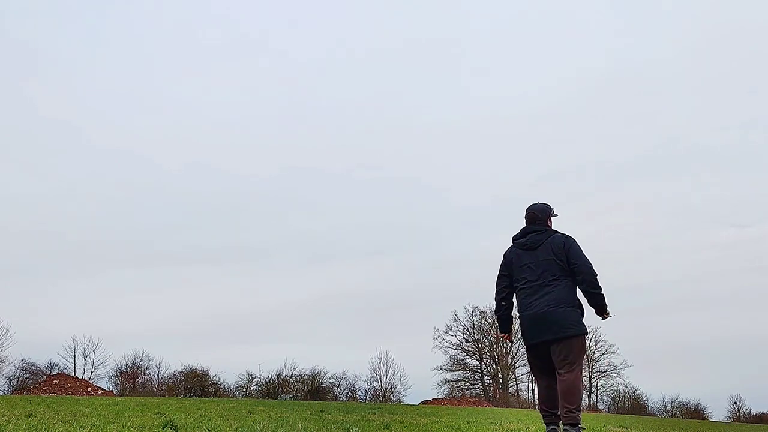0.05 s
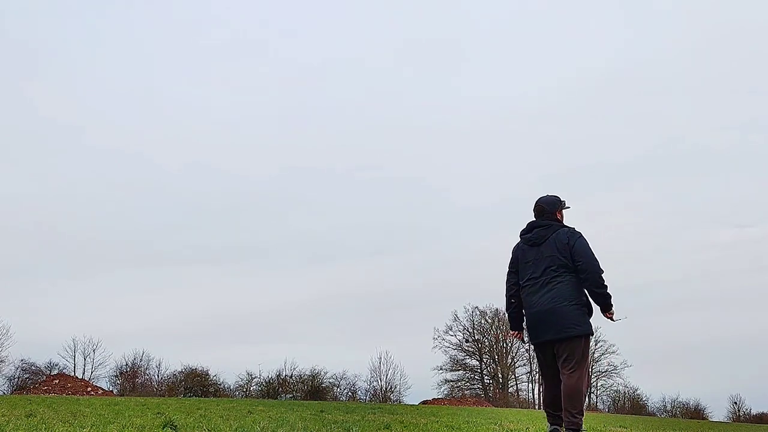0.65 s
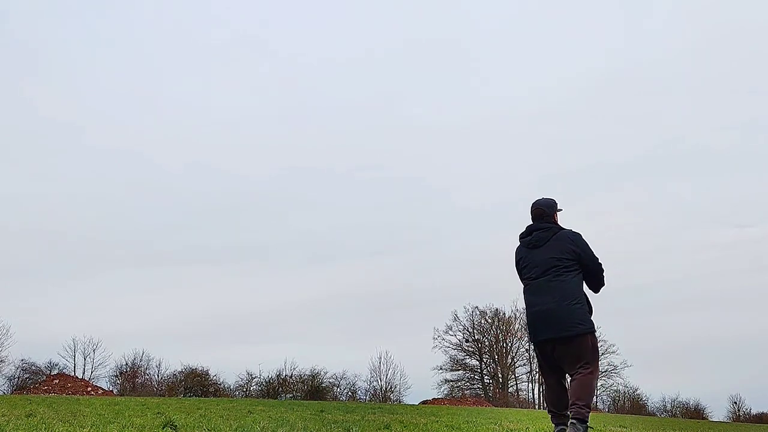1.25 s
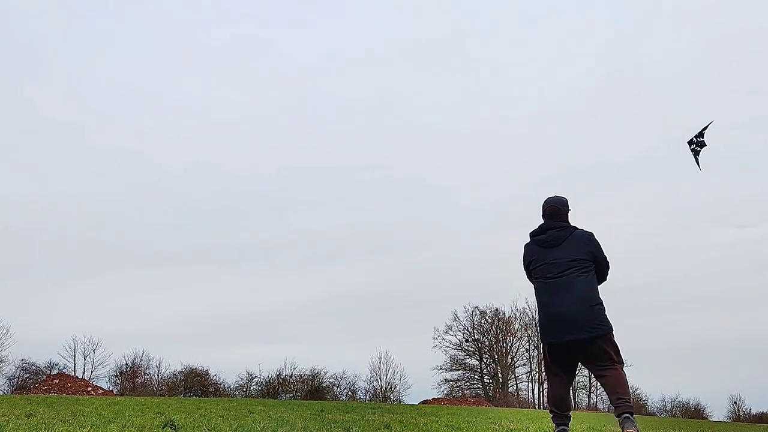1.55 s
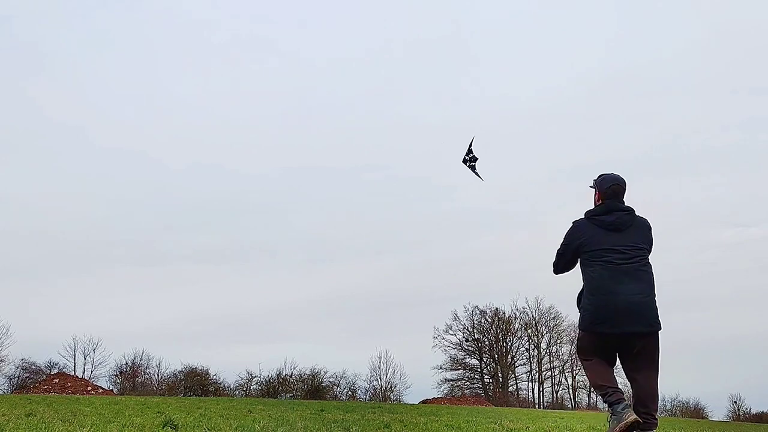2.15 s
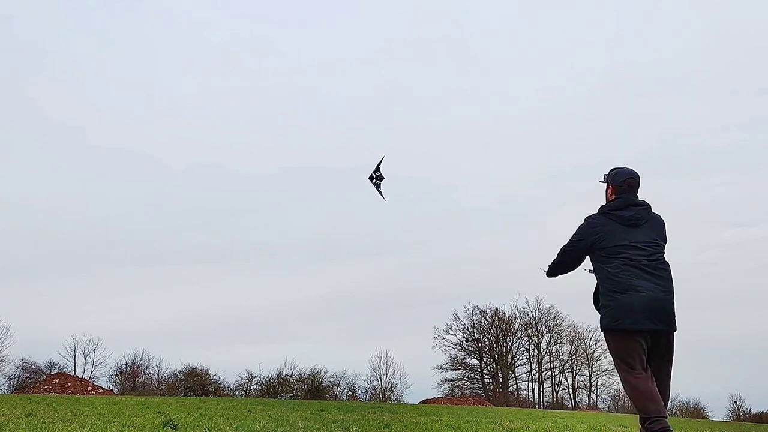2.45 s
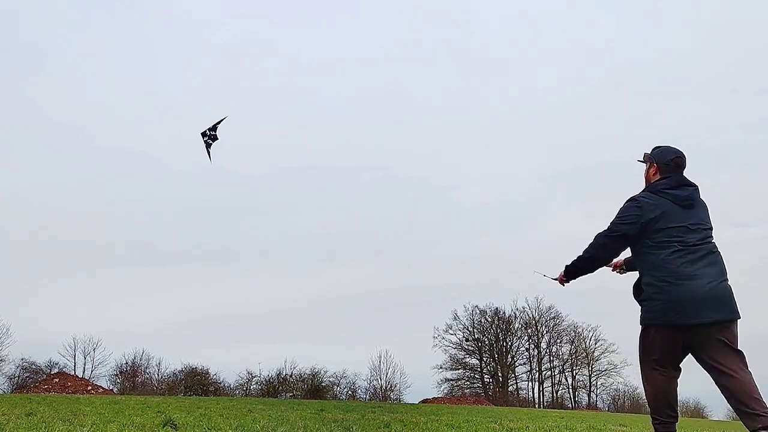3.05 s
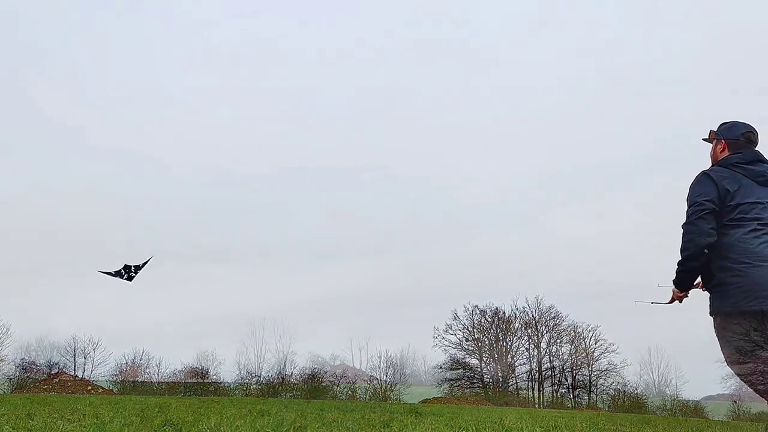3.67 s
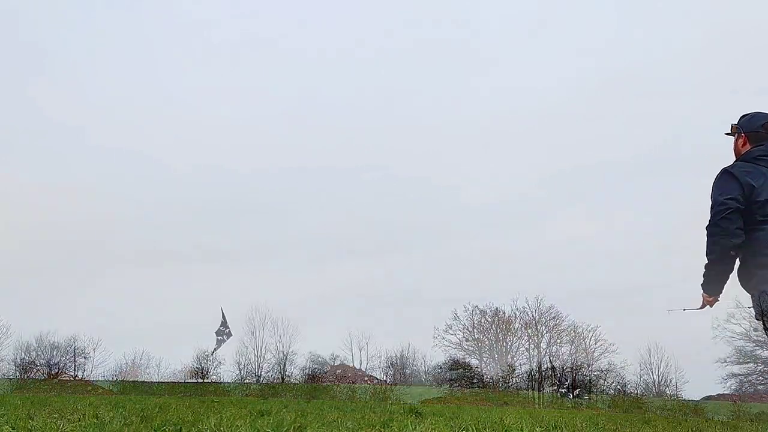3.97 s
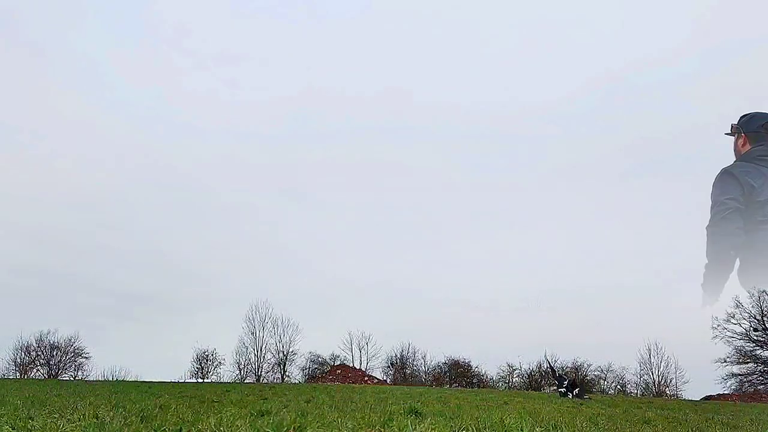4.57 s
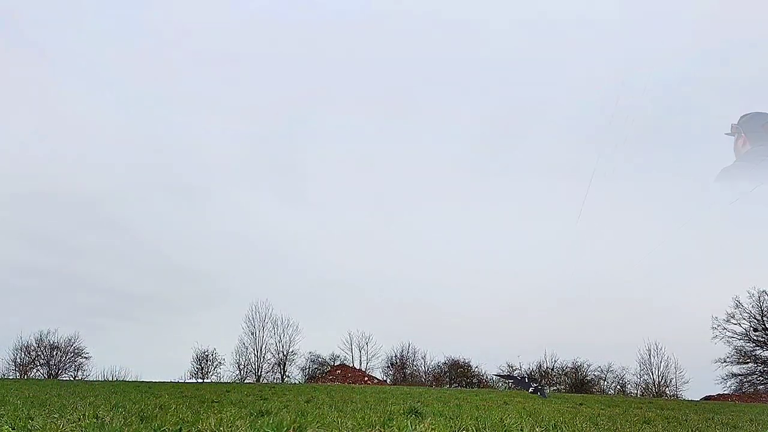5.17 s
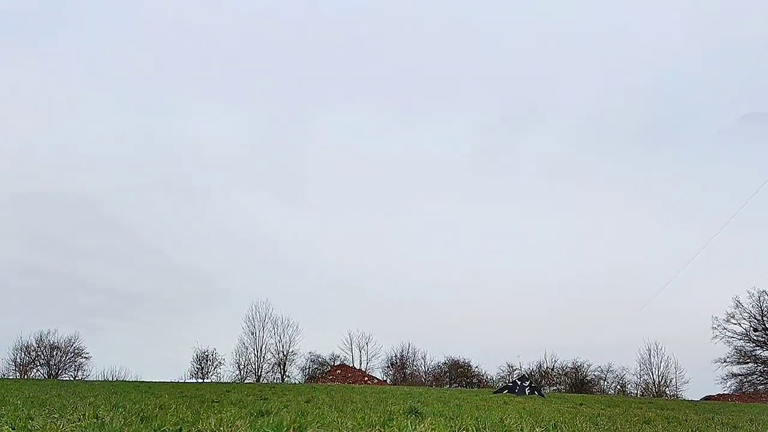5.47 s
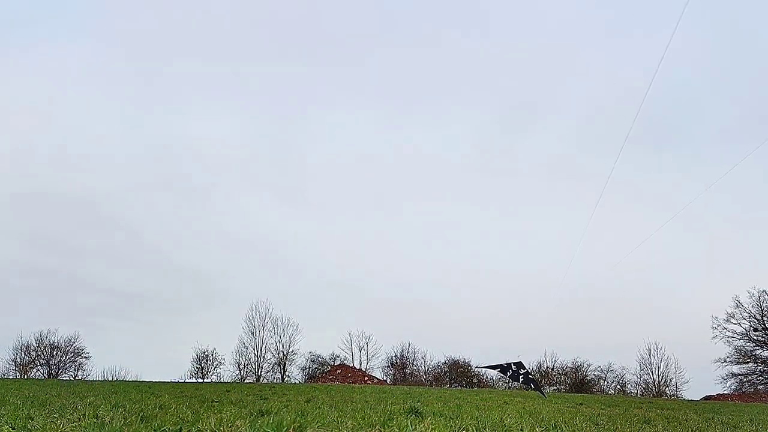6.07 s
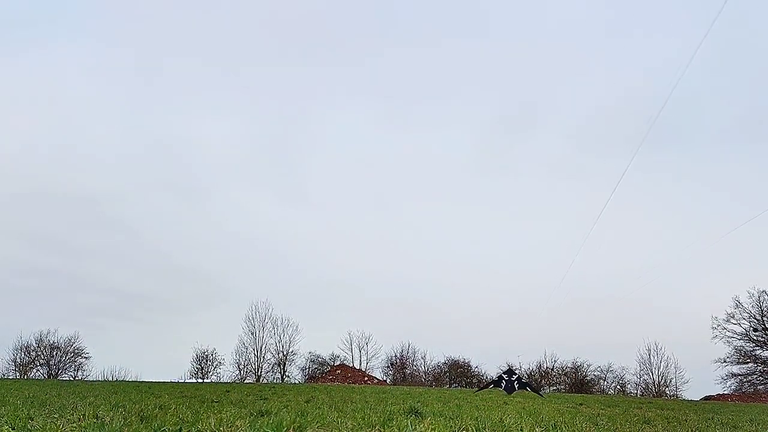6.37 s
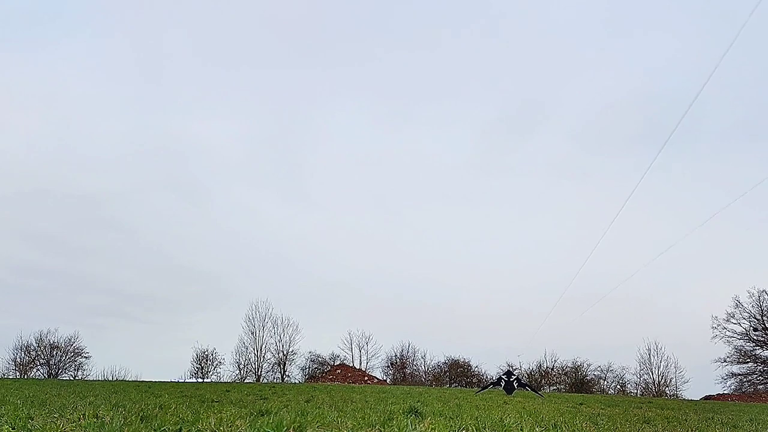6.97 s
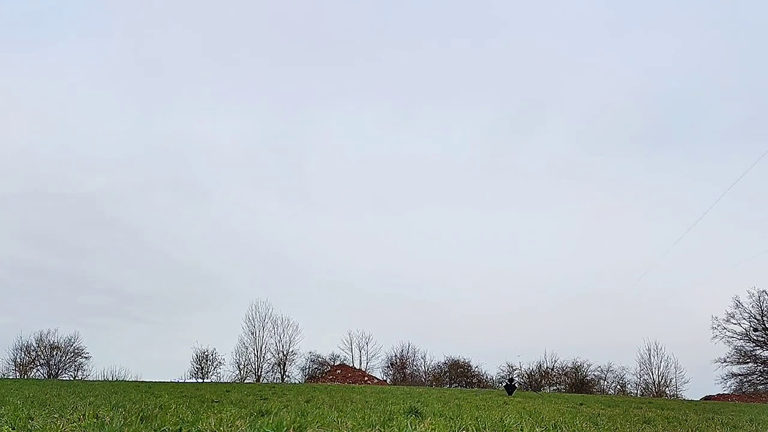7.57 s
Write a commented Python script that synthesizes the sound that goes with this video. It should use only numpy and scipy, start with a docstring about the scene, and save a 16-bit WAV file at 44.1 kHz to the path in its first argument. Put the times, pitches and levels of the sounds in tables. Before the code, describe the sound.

Low wind rumbles on a microphone near the ground in an open field, with uneven thumps, mostly on the left. At about 0.8 seconds a stunt kite catches the air on the right, its sail buzzing and its lines hissing beneath the wind. From 2 seconds the gusts hit hardest, slapping both sides, while the flutter turns ragged and the kite sweeps leftward with a hollow, shifting rush. It surges with each pull, most strongly near 2.8 seconds, buzzes again around 4, then fades as it comes down. The sound drops out briefly at about 4.6 seconds. Softer wind returns, with faint line swishes near 5 seconds and slack cloth twitching on the grass, including a dull thud at around 5.5. Another gust buffets the microphone near 6.8 seconds, and faint swishes of the lines follow in lighter wind until about 8.

```python
"""A stunt kite in the wind

A kite sweeps from right to left over a field, its sail fluttering and its lines hissing, while an
echo off the ground colours its rush. Wind buffets each port (opening) of a low microphone on its own.
The sound drops out briefly as the kite comes down, and then the kite twitches on the grass."""
import sys
import numpy as np
from scipy import signal
from scipy.fft import rfft, irfft, next_fast_len
from scipy.io import wavfile
from scipy.ndimage import uniform_filter1d, map_coordinates

SR = 44100
rng = np.random.default_rng(int(sys.argv[2]) if len(sys.argv) > 2 else 0)


def to_wav(s):
    """Save 16-bit WAV."""
    ch = np.atleast_2d(s).T  # columns
    pcm = np.round(np.clip(ch, -1, 1) * 32767)  # PCM
    wavfile.write(sys.argv[1], SR, pcm.astype(np.int16))


N = 344862
T = np.arange(N) / SR
DROPOUT_START_S, DROPOUT_END_S = 4.592, 4.783


def gain_of(db):
    """Turns decibels into a gain."""
    return np.exp(np.asarray(db) * (np.log(10) / 20))


def unit_rms(x):
    """Scales a signal to an average power of 1."""
    return x / np.sqrt(np.mean(x ** 2) + 1e-20)


def curves(rows):
    """Turns each column after the first into a curve over time."""
    times, *columns = np.transpose(rows)
    return [np.interp(T, times, column) for column in columns]


def value_at(points, f):
    """Looks up frequency f in a table, gliding between its rows."""
    hz, value = np.transpose(points)
    return np.interp(np.log(f), np.log(hz), value)


def filtered(x, response):
    """Gives each frequency its own gain."""
    size = next_fast_len(N + 4096, True)
    gain = response(np.fft.rfftfreq(size, 1 / SR) + 1)
    return irfft(rfft(np.float32(x), size) * np.complex64(gain), size)[..., :N]


def coloured(x, spectrum):
    """Shapes the tone of x, at a power of 1."""
    return unit_rms(filtered(x, lambda f: gain_of(value_at(spectrum, f))))


def noise(channels=1):
    """White noise, different in each channel."""
    return rng.standard_normal((channels, N))


def wander(rate_hz, channels=1):
    """A random drift with no wild extremes, at a power of 1."""
    times = np.arange(0, T[-1] + 1, 1 / (2 * rate_hz))
    values = np.tanh(rng.standard_normal((len(times), channels)).T / 2)
    return unit_rms(np.array([np.interp(T, times, row) for row in values]))


def delayed(x, ms):
    """A delay that may change with time."""
    return map_coordinates(x, [np.arange(len(x)) - ms * SR / 1000], order=3)


def at_ports(x, lead_ms):
    """Makes stereo: the sound reaches the left port lead_ms before the right."""
    return np.array([delayed(x, -lead_ms / 2), delayed(x, lead_ms / 2)])


def panned(pan_db):
    """Left and right gains of constant power; pan is left minus right."""
    gains = np.array([gain_of(pan_db / 2), gain_of(-pan_db / 2)])
    return gains / np.sqrt(np.mean(gains ** 2, 0))


def add(mix, start_s, sound):
    """Mixes in a stereo sound."""
    part = mix[:, max(round(start_s * SR), 0):][:, :sound.shape[1]]
    part += sound[:, :part.shape[1]]


# The tone of the background noise. Each row: frequency in Hz, relative level in dB.
BACKGROUND_SPECTRUM = [(100, -80.5), (330, -89), (500, -94.5), (700, -99), (1200, -101), (2500, -103),
                       (5000, -106), (7500, -107), (9500, -109), (14500, -107)]


def background(noise_db=-61.5, drone_db=-76.5, drone_hz=442.4, width_octaves=0.037):
    """Faint background noise: low outdoor rumble, the microphone's own hiss and a far-off drone."""
    drone = filtered(noise(), lambda f: 1 / (1 + (np.log2(f / drone_hz) / width_octaves) ** 2))
    rumble_and_hiss = coloured(noise(2), BACKGROUND_SPECTRUM)
    return gain_of(noise_db) * rumble_and_hiss + gain_of(drone_db) * unit_rms(drone)


# The wind, with one long gust midway. Each row: time in seconds, relative level in dB, pan in dB.
WIND_STRENGTH = [(0, -44.5, -0.5), (.55, -34, 2), (.98, -40, 3.5), (1.38, -28.5, 3), (1.68, -38, 6),
                 (1.92, -20.5, 3), (2.2, -23.5, -1.5), (2.48, -29.5, 7.5), (2.78, -23, 9.5),
                 (2.95, -30.5, -1), (3.35, -25, 3.5), (4.5, -30.5, 2), (4.8, -42.5, 3), (5.7, -43, 4),
                 (6.15, -40, 4.5), (6.75, -31.5, 0.5), (7.2, -44, 6.5), (7.82, -38.5, 7)]


def gusts(swirl_db=1, swell_db=4.5, swell_s=0.032):
    """Wind strength in dB at each port: the shared gust, local swirls and a swell at each buffet."""
    level_db, side_db = curves(WIND_STRENGTH)
    swells = np.zeros((2, N))
    for time_s, _, pan_db, _ in PORT_SLAPS:
        share = panned(pan_db)[:, None] ** 2 / 2
        swells = np.maximum(swells, share / (1 + ((T - time_s) / swell_s) ** 2))
    swirls = swirl_db * wander(5, channels=2)
    return level_db + np.array([side_db, -side_db]) / 2 + swirls + swell_db * swells


def eddy(t, width_s):
    """A small whirl of air crosses a port: suction, a slap, weaker suction."""
    u = t / width_s
    return (1 + u - .9 * u ** 2) * np.exp(-u ** 2 / 2)


# The tone of the wind's rumble. Each row: frequency in Hz, relative level in dB.
RUMBLE_SPECTRUM = [(10, -5), (25, 3), (55, 4.5), (100, -3), (160, -26), (300, -49.5), (700, -68),
                   (3000, -91.5)]
# Eddies in a steady breeze. Each row: width in ms, count per second, level in dB relative to
# the breeze, dB gained per dB of gust.
EDDY_SIZES = [(5.3, 36, -9.5, .35), (3.4, 32, -7.5, .6), (2, 55, -5.5, 1.35), (1.2, 100, -15, 2),
              (.54, 110, -31.5, 2)]


def wind(rumble_db=-4, breeze_db=-29, size_spread_db=9):
    """Air churns at each port: a lumpy rumble, and eddies of which the small ones need a strong gust."""
    level_db = gusts()
    rumble = coloured(noise(2), RUMBLE_SPECTRUM)
    rumble = rumble / np.sqrt(uniform_filter1d(rumble ** 2, size=6000) + 1e-9)  # steady its level
    rumble = unit_rms(rumble + 0.14 * (rumble ** 2 - 1))  # peaks are sharper than troughs
    lumps = gain_of(wander(14, channels=2))
    out = gain_of(level_db + rumble_db) * unit_rms(rumble * lumps)
    gust_db = np.minimum(level_db - breeze_db, 4.5)  # eddies stop growing in the strongest gusts
    crowding = gain_of(.5 * gust_db)  # in a lull they come one by one
    bursts = gain_of(3 * wander(20, channels=2))
    t = np.arange(-1000, 1001) / SR
    for width_ms, per_s, db, growth in EDDY_SIZES:
        chance = rng.random((2, N)) / (crowding * per_s / SR)
        hits = chance < 1
        kicks = np.zeros((2, N))
        kicks[hits] = gain_of(size_spread_db * chance[hits]) * bursts[hits] / np.sqrt(crowding[hits])
        kicks[hits] = unit_rms(kicks)[hits] * gain_of(breeze_db + db + growth * gust_db[hits])
        shape = eddy(t, width_ms / 1000)
        shape /= np.linalg.norm(shape)
        out += signal.oaconvolve(np.float32(kicks), np.float32(shape)[None], "same", axes=1)
    return out


# The strongest eddies. Each row: time in seconds, relative peak in dB, pan in dB, width in ms.
PORT_SLAPS = [(.378, -35.5, 23, 2.8), (.515, -25, 0, 3.4), (.717, -40.5, 18, 2.7), (1.174, -23.5, 32, 2.05),
              (1.246, -13.5, 32, 3.15), (2.024, -14, 16.5, 1.29), (2.184, -11.5, -21, 1.02),
              (2.29, -16, 25, 1.24), (2.689, -17, 36, 0.65), (2.789, -12.5, 8, 1),
              (2.811, -21.5, -4.5, 0.65), (3.001, -13.5, -38, 1.3), (3.28, -19.5, -1, 0.8),
              (3.334, -14, 26, 1.09), (3.55, -16.5, 7, 1.76), (3.755, -30, -20, 1.3),
              (3.955, -24, 27.5, 1.04), (4.124, -16, -24, 3.1), (4.157, -14, 35, 1.28),
              (4.3462, -17, 28, 0.82), (5.142, -24.5, 29, 4), (5.328, -28.5, 20.5, 2.6),
              (5.515, -23.5, 31, 2.93), (5.804, -27.5, 25, 2.1), (5.862, -25.5, 12.5, 2.8),
              (6.388, -29, 9.5, 3.1), (6.502, -30.5, 34.5, 0.84), (6.793, -16, 24.5, 1.58),
              (6.843, -18.5, 21, 1.01), (6.966, -23.5, 25, 1.82), (7.059, -37, -18.5, 1.8),
              (7.432, -35.5, 18.5, 3.05)]


def buffets(level_db=-1, peak_s=0.00267, spacing_s=0.00827, fade=0.76):
    """A strong eddy slaps a port, and two weaker, wider ones follow it."""
    out = np.zeros((2, N))
    t = np.arange(-1000, 3000) / SR
    for time_s, db, pan_db, width_ms in PORT_SLAPS:
        slap = np.zeros(len(t))
        for k, stretch in enumerate(rng.uniform(0.75, 1.34, 3)):
            centre_s = peak_s + k * stretch * spacing_s
            slap += fade ** k * eddy(t - centre_s, width_ms / 1000 * (1 + 0.38 * k))
        slap *= gain_of(db + level_db) / abs(slap).max()
        add(out, time_s + t[0], panned(pan_db)[:, None] * slap)
    return out


# The flutter's overtones, from the second up. Each row: relative dB in slow flapping, then in fast.
OVERTONES = [(0, -3), (4.5, -1), (0, -2), (0, -1), (-8, 3), (-13, -5), (-10, -1), (-20, -10), (-17, -12),
             (-22, -19)]
# The tone of ragged flapping. Each row: frequency in Hz, relative level in dB.
ROAR_SPECTRUM = [(60, -15), (150, -4), (220, 4.5), (380, -3), (500, -7), (750, -12.5), (1100, -23),
                 (2000, -31), (6000, -45)]


def sail_flutter(phase, flap_hz, regularity, slow_hz=75, fast_hz=79):
    """The sail's back edge buzzes when it flaps evenly and roars when it flaps raggedly."""
    fast = np.interp(flap_hz, [slow_hz, fast_hz], [0, 1])  # fast ripples favour higher overtones
    buzz = np.zeros(N)
    for k, (slow_db, fast_db) in enumerate(OVERTONES, 2):
        level = gain_of(slow_db + fast * (fast_db - slow_db))
        buzz += level * np.cos(k * phase + rng.uniform(0, 2 * np.pi))
    roar = coloured(noise()[0], ROAR_SPECTRUM)
    return regularity * unit_rms(buzz) + np.sqrt(1 - regularity ** 2) * roar


# The tone of the lines. Each row: frequency in Hz, relative level in dB.
HISS_SPECTRUM = [(1500, -21), (3000, 3.5), (4200, -1.5), (5500, 0), (6700, -1.5), (8200, -6.5),
                 (9300, -14.5), (11000, -21.5), (15000, -24.5)]


def line_hiss(puffs, patchy_db=1.3):
    """Each stretch of line hisses in its own band, and swells and fades on its own."""
    hiss = coloured(noise(3) * puffs, HISS_SPECTRUM)
    low = filtered(hiss, lambda f: 1 / (1 + (f / 4600) ** 10))
    low_and_mid = filtered(hiss, lambda f: 1 / (1 + (f / 6500) ** 10))
    bands = low, low_and_mid - low, hiss - low_and_mid
    swells = gain_of(patchy_db * wander(9, channels=3))
    return unit_rms(sum(swell * band for swell, band in zip(swells, bands)))


# The echo weakens as the sail lands. Each row: time in seconds, relative strength from 0 to 1.
ECHO_STRENGTH = [(4.05, 1), (4.3, .5)]


def ground_echo(x, delay_ms, strength=.66, dull_hz=9000, hard_ground_hz=750, height_spread=.075):
    """Adds an echo that cancels a comb of frequencies; the higher the kite, the later it comes."""
    echo = filtered(x, lambda f: strength / (1 + (f / dull_hz) ** 3))  # grass soaks up treble
    echo = echo * curves(ECHO_STRENGTH)[0]
    # An echo that skims the grass has its phase turned, except in the bass.
    bass = filtered(echo, lambda f: 1 / (1 + (f / hard_ground_hz) ** 6))
    turn_rad = 2.2 * np.maximum(1 - delay_ms / .5, 0)
    echo = bass + (signal.hilbert(echo - bass) * np.exp(-1j * turn_rad)).real
    # The kite spans several heights, which blurs the comb's upper teeth.
    for height, share in (1 - height_spread, .25), (1, .5), (1 + height_spread, .25):
        x = x + share * np.array([delayed(port, delay_ms * height) for port in echo])
    return x


# The sail surges with each pull. Each row: time in seconds, airspeed in dB relative to a hard pull.
SAIL_SPEED = [(.82, -11.5), (.93, -18.5), (1.12, -2.5), (1.22, -5.5), (1.42, -16), (1.64, -8.5),
              (1.78, 0.5), (2.05, -1.5), (2.3, 1), (2.72, 0.5), (2.8, 9), (2.88, 0.5), (3.04, 1), (3.2, -5),
              (3.44, -7), (3.54, .5), (3.65, -3), (3.76, -8.5), (3.97, 0.5), (4.07, -3), (4.24, -12),
              (4.56, -12.5)]
# The lines sweep sideways. Each row: time in seconds, speed in dB relative to a hard pull.
LINE_SWEEP = [(.82, -17), (.94, -17.5), (1.16, -5), (1.27, -8), (1.42, -14), (1.65, -11.5), (1.78, -4),
              (1.92, -2.5), (2.05, -5.5), (2.28, 2), (2.5, -4), (2.72, -3.5), (2.81, 2), (2.9, -2.5),
              (3.0, -1), (3.13, -5), (3.35, -8), (3.48, -7.5), (3.6, -1.5), (3.77, -9), (3.92, -2),
              (3.99, -5.5), (4.06, -2.5), (4.22, -12), (4.56, -14.5)]


def flight_levels(launch_s=0.845, fill_s=0.087, sink_s=4.1, sink_db_per_s=25):
    """Gains for flutter, rush and hiss: the faster the sail and lines move, the louder they are."""
    sail_db, lines_db = curves(SAIL_SPEED)[0], curves(LINE_SWEEP)[0]
    filling = np.exp(-(np.maximum(launch_s - T, 0) / fill_s) ** 2)  # the sail snaps full
    aloft = filling * np.interp(T, [DROPOUT_START_S, DROPOUT_END_S], [1, 0])
    sinking_db = sink_db_per_s * np.maximum(T - sink_s, 0)  # the rush dies as the kite comes down
    flutter = aloft * gain_of(-46 + 0.59 * sail_db)
    rush = aloft * gain_of(-49.5 + 0.54 * sail_db - sinking_db)
    hiss = aloft * gain_of(-49.5 + lines_db)
    return flutter, rush, hiss


# The kite's path. Each row: time in seconds, left port's lead in ms, ground echo's delay in ms.
FLIGHT_PATH = [(.7, -.375, .14), (1.0, -.375, .22), (1.1, -.375, .27), (1.2, -.37, .35), (1.33, -.35, .46),
               (1.7, -.27, .46), (1.92, -.22, .47), (2.15, -.177, .5), (2.3, -.13, .49), (2.45, -.1, .465),
               (2.72, -.01, .39), (3.03, .055, .42), (3.18, .072, .47), (3.3, .106, .5), (3.55, .152, .49),
               (3.7, .178, .42), (3.85, .192, .31), (3.95, .192, .235), (4.05, .18, .16), (4.28, .108, .1),
               (4.55, .03, .08)]
# The sail's back edge. Each row: time in seconds, flaps per second, regularity from 0 to 1.
EDGE_FLAPPING = [(.78, 65, .9), (.95, 65, .88), (1.17, 74.6, .94), (1.27, 72.8, .9), (1.42, 66, .7),
                 (1.62, 68, .88), (1.76, 71, .8), (2.0, 77, .35), (2.7, 90, .2), (3.3, 83, .15),
                 (3.62, 80, .4), (3.8, 79, .68), (3.95, 80.8, .78), (4.07, 80, .7), (4.22, 72, .2)]
# The tone of air leaving the sail. Each row: frequency in Hz, relative level in dB.
RUSH_SPECTRUM = [(400, -4), (900, 3), (1150, 4), (1450, 2), (2200, 0), (3100, -5), (4500, -21), (8000, -36),
                 (15000, -50)]
# Rush and hiss that come straight from the kite. Each row: frequency in Hz, share of the power.
DIRECT_SHARE = [(900, .98), (2600, .96), (3600, .92), (4800, .88), (6000, .8), (7500, .56), (9500, .38)]


def flying_kite(jitter=0.01195, puff_depth=0.063, flicker_db=1.21, pan_db_per_ms=4):
    """The sail flutters, air rushes off it in time with the flapping, and the lines hiss."""
    flutter_gain, rush_gain, hiss_gain = flight_levels()
    lead_ms, echo_ms = curves(FLIGHT_PATH)
    flap_hz, regularity = curves(EDGE_FLAPPING)
    phase = 2 * np.pi * np.cumsum(flap_hz * (1 + jitter * wander(33.4)[0])) / SR
    sail = flutter_gain * sail_flutter(phase, flap_hz, regularity)
    puffs = (1 + puff_depth * np.cos(phase)) * gain_of(flicker_db * wander(30)[0])
    air = rush_gain * coloured(noise(3) * puffs, RUSH_SPECTRUM) + hiss_gain * line_hiss(puffs)
    # The treble comes from all along the lines, so it differs between the ports.
    direct = sail + filtered(air[0], lambda f: np.sqrt(value_at(DIRECT_SHARE, f)))
    spread = filtered(air[1:], lambda f: np.sqrt(1 - value_at(DIRECT_SHARE, f)))
    kite = ground_echo(at_ports(direct, lead_ms) + spread, echo_ms)
    return kite * panned(pan_db_per_ms * lead_ms)  # the nearer port is louder


# Gusts on a port. Each row: middle in seconds, half length in seconds, relative level in dB, pan in dB.
LINGERING_GUSTS = [(1.901, 0.034, -28, 27), (2.042, 0.057, -22, 2), (2.299, 0.024, -27, 9),
                   (2.762, 0.042, -26, 12.5), (2.858, 0.037, -25, -4), (3.037, 0.041, -24.5, -15),
                   (3.297, .06, -31.5, 3.5), (3.937, 0.033, -35, 11.5), (6.832, 0.039, -32, 9)]


def shudders(pitch_hz=165, width_octaves=0.89, level_db=-2.5):
    """A gust that stays on a port sheds a quick train of eddies: a full, throaty rumble."""
    train = filtered(noise(2), lambda f: 1 / (1 + (np.log2(f / pitch_hz) / width_octaves) ** 2 / 2) ** 3)
    train = unit_rms(train)
    train = train / np.sqrt(uniform_filter1d(train ** 2, size=1500) + 1e-9)  # steady its level
    power = np.zeros((2, N))
    for middle_s, half_s, db, pan_db in LINGERING_GUSTS:
        swell = gain_of(db + level_db) * np.exp(-((T - middle_s) / half_s) ** 2)
        power += (panned(pan_db)[:, None] * swell) ** 2
    return train * np.sqrt(power)


# Tugged lines and the sail's edge cut the air. Each row: middle in seconds, half length in seconds,
# relative level in dB, pitch in Hz, glide in octaves per second, width in octaves, left lead in ms.
AIR_CUTS = [(2.288, 0.036, -54.5, 6900, -4, 0.13, -.12), (4.049, .06, -58, 4590, .5, .25, .18),
            (4.904, 0.079, -68.5, 5260, -0.5, 0.74, 0), (4.916, 0.087, -69.5, 2300, 0.5, 0.74, 0),
            (4.947, 0.016, -53.5, 3020, 2.5, 0.19, -0.51), (4.977, .019, -62.5, 2470, -12, .13, -.45),
            (6.767, 0.16, -78.5, 3500, 0, 0.7, 0), (7.332, 0.11, -70, 3650, 0.5, 1, .06),
            (7.732, .011, -60.5, 2610, 42.5, 0.26, -0.38), (7.742, 0.009, -59.5, 2710, -6.5, 0.07, -0.49),
            (7.74, .008, -66, 3600, -0.5, .3, -.45), (7.776, 0.013, -67, 2040, -4.5, 0.22, -0.5),
            (7.78, 0.07, -68, 3800, 2.5, 1, 0.053)]


def swishes(scatter=0.79):
    """A moving line sheds tiny whirls: a band of noise whose pitch follows the line's speed."""
    out = np.zeros((2, N))
    for middle_s, half_s, db, pitch_hz, glide, width, lead_ms in AIR_CUTS:
        hz, frame_s, spectra = signal.stft(rng.standard_normal((3, SR // 2)), SR, nperseg=256)
        centre_s = frame_s[-1] / 2
        bend = glide * np.clip(frame_s - centre_s, -2 * half_s, 2 * half_s)
        octaves_off = np.log2((hz[:, None] + 1) / pitch_hz) - bend
        _, band = signal.istft(spectra / (1 + (octaves_off / width) ** 2 / 2) ** 2, SR, nperseg=256)
        t = np.arange(band.shape[1]) / SR - centre_s
        swish = unit_rms(band) * gain_of(db) * np.exp(-(t / half_s) ** 2)
        add(out, middle_s - centre_s, at_ports(swish[0], lead_ms) + scatter * swish[1:])
    return out


# The sail on the grass. Each row: start in seconds, decay in seconds, level in dB, left lead in ms.
SAIL_TWITCHES = [(4.878, 0.21, -55, -0.12), (4.976, 0.032, -49.5, -0.063), (5.158, 0.09, -56, -0.13),
                 (5.551, 0.05, -35.5, -0.14), (5.622, 0.015, -50, -0.19), (5.822, 0.053, -58, 0.024),
                 (6.708, 0.14, -58, -0.0089)]
# The tone of slack cloth. Each row: frequency in Hz, relative level in dB.
CLOTH_SPECTRUM = [(60, -30), (230, 6.5), (400, 2), (560, -1.5), (760, -3.5), (950, -11), (1300, -33.5),
                  (4000, -26.5), (9000, -39.5), (15000, -44)]


def grounded_sail(rise_s=0.023, crumple_db=2.5):
    """Slack cloth fills with air in a ragged, dull thud."""
    out = np.zeros((2, N))
    cloth = coloured(noise()[0] * gain_of(crumple_db * wander(130)[0]), CLOTH_SPECTRUM)
    t = np.arange(SR // 3) / SR
    for start_s, decay_s, db, lead_ms in SAIL_TWITCHES:
        fill = np.minimum(t / rise_s, 1) * np.exp(-t / decay_s) * (1 - t / t[-1])
        thud = gain_of(db) * fill * cloth[round(start_s * SR):][:len(t)]
        add(out, start_s, at_ports(thud, lead_ms))
    return out


def scene():
    """Wind on the microphone, the kite aloft and on the grass, and faint background noise."""
    return wind() + buffets() + shudders() + flying_kite() + grounded_sail() + swishes() + background()


# How the ports ring, left then right. Each row: frequency in Hz, width in Hz, boost in dB.
PORT_RINGS = [(7600, 1140, 8), (6900, 1200, 1)]
# The right port rings lower, so its treble lags. Each row: frequency in Hz, phase lag in radians.
RIGHT_LAG = [(1000, 0), (3000, .18), (5000, .55), (6000, 1), (7000, 1.9), (8000, 1.3), (11000, 0)]


def record(dry, cutoff_hz=14300):
    """Each port rings and dips in the treble, the sound drops out briefly, and the top treble is cut."""
    def bell(f, hz, width_hz, db):
        return gain_of(db / (1 + (2 * (f - hz) / width_hz) ** 2))

    def left_port(f):
        return bell(f, *PORT_RINGS[0]) * bell(f, hz=5500, width_hz=4850, db=-3)

    def right_port(f):
        lag = np.exp(-1j * value_at(RIGHT_LAG, f))
        return bell(f, *PORT_RINGS[1]) * bell(f, hz=8200, width_hz=1000, db=-5) * lag

    ports = np.array([filtered(dry[0], left_port), filtered(dry[1], right_port)])
    audible = uniform_filter1d(1. * ((T < DROPOUT_START_S) | (T > DROPOUT_END_S)), size=200)
    lowpass = signal.firwin(1023, cutoff_hz, window=("kaiser", 9), fs=SR)
    return signal.oaconvolve(ports * audible, lowpass[None], "same")


dry = scene()
out = record(dry)
to_wav(out)
```